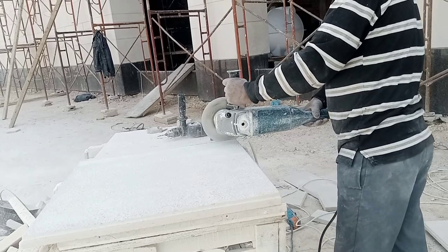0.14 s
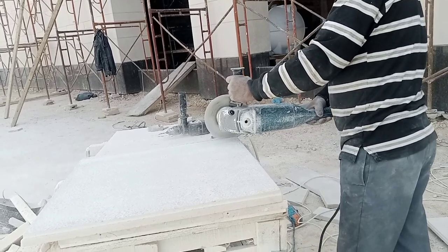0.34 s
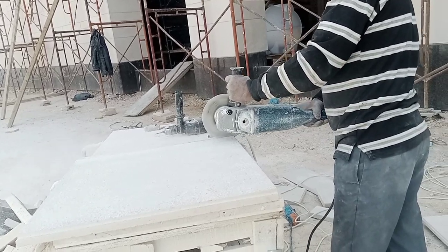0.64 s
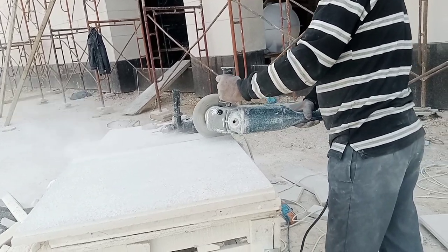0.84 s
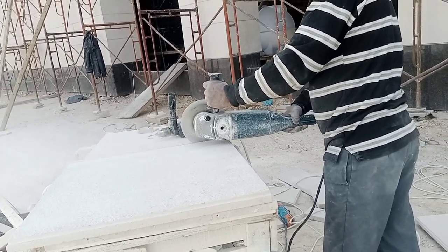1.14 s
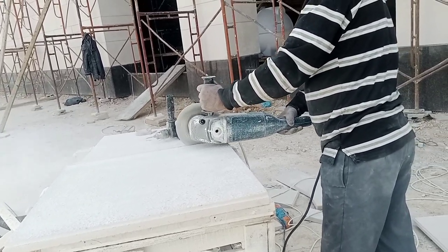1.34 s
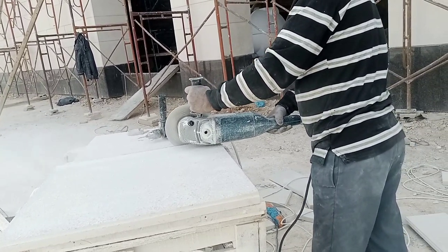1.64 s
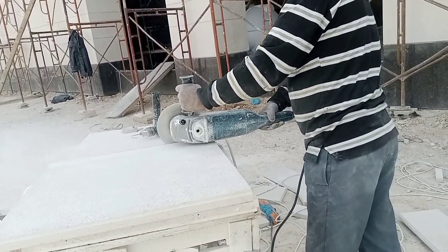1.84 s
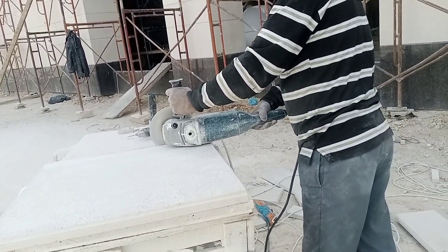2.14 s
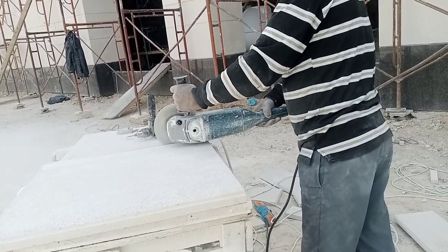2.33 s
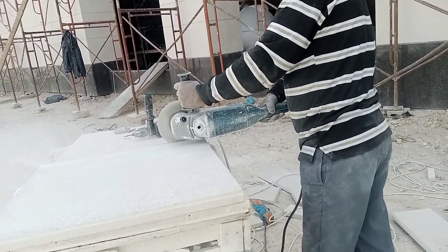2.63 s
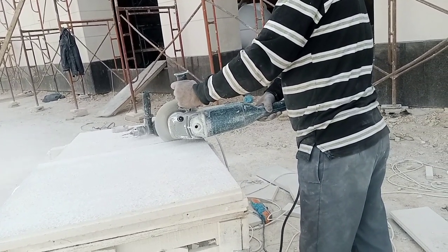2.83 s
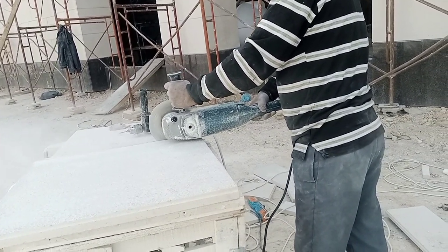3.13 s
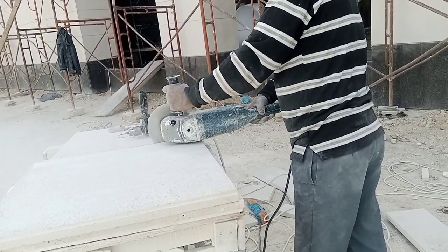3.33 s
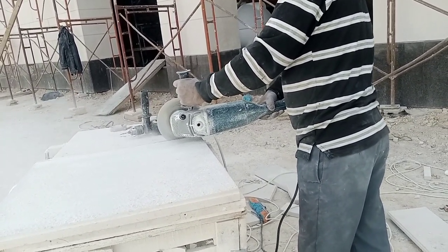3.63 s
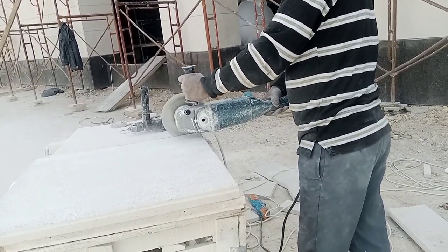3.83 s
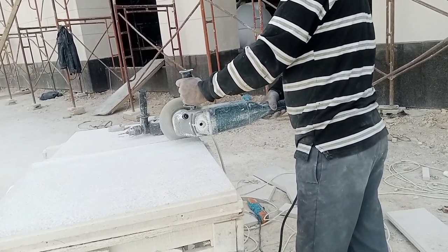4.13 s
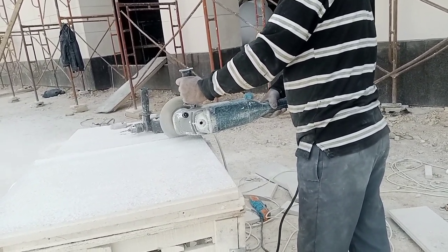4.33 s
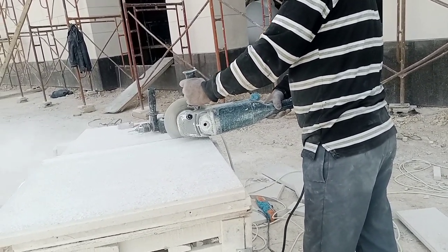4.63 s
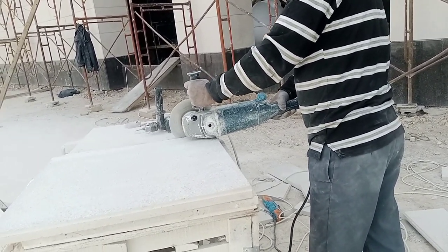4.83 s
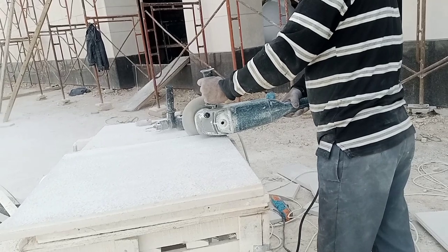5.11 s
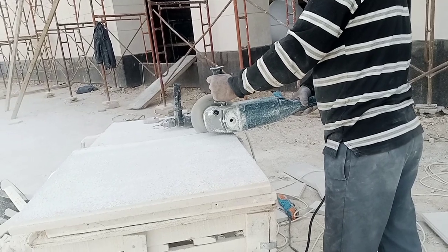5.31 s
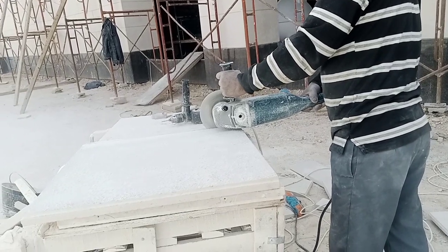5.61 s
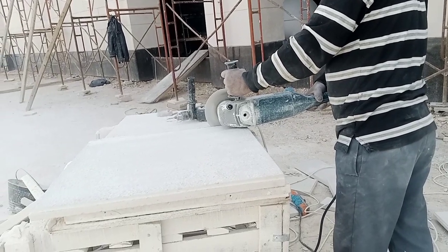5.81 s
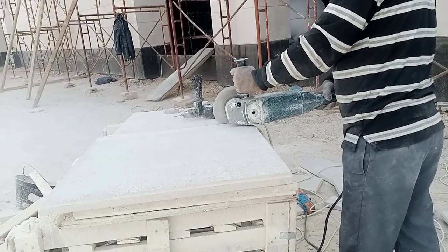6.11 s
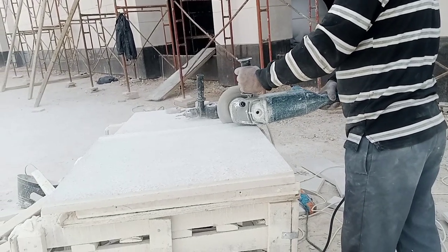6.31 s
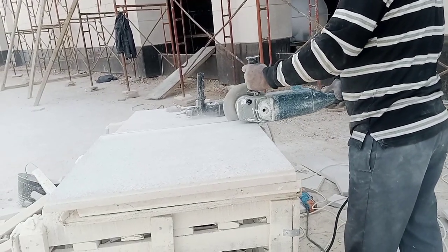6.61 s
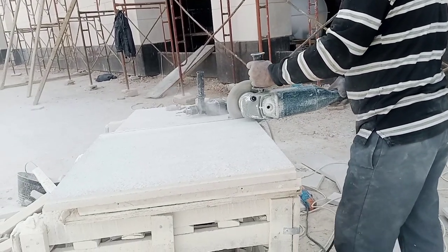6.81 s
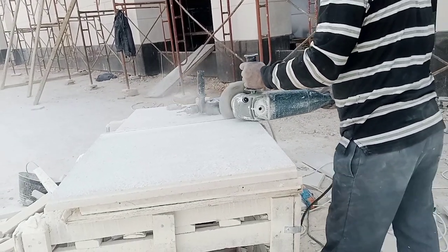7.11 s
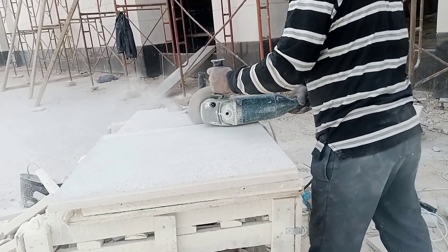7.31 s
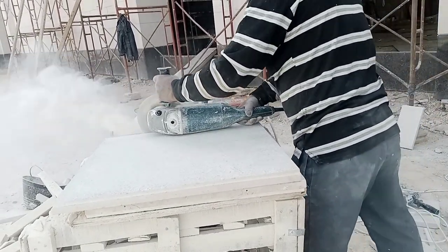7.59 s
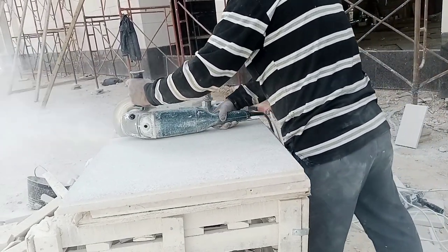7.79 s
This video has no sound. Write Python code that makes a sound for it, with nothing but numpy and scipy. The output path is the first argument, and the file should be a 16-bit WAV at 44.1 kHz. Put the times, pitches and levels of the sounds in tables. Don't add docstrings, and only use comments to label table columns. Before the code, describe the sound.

Outdoors and a few steps from the phone, a large angle grinder is already cutting a stone slab at full loudness. From 0 s there is dense gritty hiss, metallic disc ringing and gear and fan whine, over a rough midrange slab hum. Pitch rises briefly to about 0.6 s, sags under load to its lowest around 2 s, then climbs unevenly. Short rough tones sing out early and near 3.7 s. Thin, very high squeal rubs along the cut, clearest around 3.6-4.5 s, then fades after 4.9 s. The ring brightens from about 5.3 s. Near 6.4 s the disc bites, clears the cut and revs up; hum and clean tones thin, but harsh hiss remains. Faint dull pallet knocks come at 7.1 and 7.4 s amid small wind thumps. Pressure stutters near 7.7 s, and the grinder is still running high at 8 s.

```python
import sys
import numpy as np
from scipy import signal
from scipy.fft import rfft, irfft, next_fast_len
from scipy.io import wavfile
from scipy.ndimage import uniform_filter1d, minimum_filter1d, map_coordinates

SR = 44100
rng = np.random.default_rng(int(sys.argv[2]) if len(sys.argv) > 2 else 0)


def unload_wav(signal):
    wavfile.write(
        sys.argv[1],
        SR,
        np.round(np.clip(np.atleast_2d(signal).T, -1, 1) * 32767).astype(np.int16),
    )


def field_ratio(decibels):
    return 10 ** (np.asarray(decibels, dtype=float) / 20)


N = 350595
STEP = 64
SIZE = next_fast_len(N + 8192)
TEETH, BLADES = 47, 14
GEAR = 47 / 10
HUMMED = 8, 9, 10, 18, 24


def unit(x):
    return x / np.sqrt(np.mean(x ** 2) + 1e-20)


def along(points, hz):
    f, v = np.transpose(points)
    return np.interp(np.log(hz + 1), np.log(f + 1), v)


def slow_times():
    return np.arange(0, N + STEP, STEP) / SR


def full(slow):
    return np.interp(np.arange(N), np.arange(0, N + STEP, STEP), slow)


def curves(rows):
    s, *cols = np.transpose(rows)
    return [np.interp(slow_times(), s, c) for c in cols]


def bumps(rows):
    t = slow_times()
    return sum((db * np.exp(-((t - s) / half) ** 2) for s, db, half in rows), 0 * t)


def wobble(rate):
    knots = rng.standard_normal(int(N * rate / SR) + 4)
    return map_coordinates(knots, [slow_times() * rate])


def sine(cycles):
    return np.sin(np.float32(2 * np.pi * (cycles - np.floor(cycles))))


def resonance(f, modes):
    return sum(field_ratio(db) * f * w / np.hypot(c * c - f * f, f * w) for c, w, db in modes)


def coloured(bins, spectrum, modes=()):
    f = np.fft.rfftfreq(SIZE, 1 / SR)
    ring = resonance(f, modes) if modes else 1
    gain = np.float32(field_ratio(along(spectrum, f)) * ring)
    return unit(irfft(bins * gain, SIZE)[:N])


def patchy(x, depth_db, wide_hz, long_s, size=1024):
    z = signal.stft(np.float32(x), nperseg=size)[2]
    field = rng.standard_normal(z.shape, np.float32)
    for cells, axis in ((wide_hz * size / SR, 0), (long_s * SR * 2 / size, 1)):
        cells = max(round(cells), 1)
        field = uniform_filter1d(uniform_filter1d(field, cells, axis), cells, axis)
    return signal.istft(z * np.float32(field_ratio(depth_db * unit(field))), nperseg=size)[1][:N]


def repeating(turns, orders, drift_db, wear, without, size=2048, count=16):
    sizes = np.zeros((N // STEP + 2, size // 2 + 1), np.complex64)[::count]
    lowest, highest = int(orders[0][0]), int(orders[-1][0])
    for k in sorted(set(range(lowest, highest + 1)) - set(without)):
        height = field_ratio(along(orders, k) + drift_db * wobble(wear))[::count]
        sizes[:, k] = height * np.exp(2j * np.pi * rng.random())
    profile = np.pad(irfft(sizes, size) * size / 2, ((0, 1), (0, 1)), "wrap")
    place = [np.arange(N) / (STEP * count), turns % 1 * size]
    return map_coordinates(profile, place, order=1) * 2 / np.sqrt(SR)


def stance_db(dbs, shares):
    return np.dot(dbs, shares) / sum(shares)


def posed(drive, shares, colours):
    return sum(full(share) * coloured(drive, colour) for share, colour in zip(shares, colours))


# (time [s], level [dB])
WIND = [(0, -61), (4.4, -60.5), (5.2, -65.5), (6.7, -73), (7.95, -69)]
# (time [s], change [dB], half length [s])
GUSTS = [(.25, 5, 0.11), (1.37, 7, 0.17), (1.75, 3.5, .2), (2.97, 0, 0.072), (4.74, -10, .04),
         (5.02, 5, .05), (5.38, 8, 0.034), (6.86, 10, .08), (7.24, -12, .05), (7.37, 10, .05),
         (7.62, 11, 0.047), (7.78, -18, .05)]
# (frequency [Hz], level [dB per Hz])
BUFFET = [(15, -30), (40, -16), (70, -2.5), (120, 1.5), (170, -4.5), (400, -60)]


def wind():
    lumps = patchy(rng.standard_normal(N), depth_db=2, wide_hz=45, long_s=.07, size=2048)
    level_db = curves(WIND)[0] + bumps(GUSTS) + 2.0 * wobble(5.9)
    return full(field_ratio(level_db)) * coloured(rfft(lumps, SIZE), BUFFET)


# (time [s], peak [dB], frequency [Hz])
STEPS = [
    (7.12, -43, 215),
    (7.13, -45, 320),
    (7.42, -43, 220),
]


def steps():
    out = np.zeros(N + SR)
    t = np.arange(SR // 4) / SR
    for s, db, hz in STEPS:
        envelope = field_ratio(db - 60 * t / 0.21) * (1 - np.exp(-t / 0.013))
        out[round(s * SR):][:len(t)] += envelope * np.sin(2 * np.pi * hz * t)
    return out[:N]


# (time [s], frequency [Hz], level
# [dB], half length [s])
SINGS = [(.2, 1700, -33, .1), (.5, 1100, -37, .06), (.63, 1700, -31, .06), (1.33, 1075, -37, .12),
         (2.44, 1075, -38, .07), (3.75, 1720, -35, .15), (5.9, 182, -49, .4), (2.07, 990, -36, .04)]


def singing():
    t, slow = np.arange(N) / SR, slow_times()
    out = np.zeros(N)
    for s, hz, db, half in SINGS:
        envelope = field_ratio(db + 2 * wobble(40)) * np.exp(-((slow - s) / half) ** 2)
        out += full(envelope) * sine(hz * t + full(0.073 * wobble(40)))
    return out


# (frequency [Hz], width [Hz], level [dB])
SLAB = [(231, 55, -5), (397, 60, -6.5), (503.2, 34, -4), (690, 51, -6.5), (987, 12.5, 0.5),
        (1101, 45, -3.5), (1426, 32, -3), (1900, 82, -13.5)]
# (frequency [Hz], level [dB per Hz])
SLAB_CUT = [(100, -50), (160, -4.5), (200, -1.5), (1750, 2.5), (2200, -26), (3700, -120)]
SLAB_FREE = [(120, -68), (200, -31), (333, -5), (503, -8.5), (892, -9), (967, -19), (1030, -4.5),
             (1700, -9.5), (2210, -17), (3740, -120)]
SLAB_OVER = [(120, -74), (200, -23), (361, -22), (395, -12.5), (526, -4.5), (664, -22), (993, -0.5),
             (1160, -11), (1700, -5.5), (2210, -22), (3740, -120)]


def slab_hum(force, shares, touch, push_db, weight_db):
    contact, lean = full(touch), full(shares[3])
    shaken = rfft(patchy(force, depth_db=1.8, wide_hz=60, long_s=.3), SIZE)
    free = (1 - lean) * coloured(shaken, SLAB_FREE) + lean * coloured(shaken, SLAB_OVER)
    slab = contact ** 2 * coloured(shaken, SLAB_CUT, SLAB) + (1 - contact) * free
    rock_db = 2 * wobble(7)
    level_db = stance_db((-36, -33.5, -40, -37.5), shares) + 1.15 * push_db + weight_db + rock_db
    return full(field_ratio(level_db)) * slab


# (frequency [Hz], level [dB])
FOURTH = [(165, -77), (190, -66), (200, -52), (220, -44.5), (235, -41.5), (250, -49), (320, -50)]
ARMATURE = [(190, -54), (214, -45.5), (226, -47.5), (238, -46.5), (252, -48.5), (270, -77), (325, -56),
            (370, -47)]
MESH = [(1915, -31), (2050, -39), (2150, -33), (2330, -30), (2445, -29.5), (2570, -26.5), (2750, -29),
        (2900, -24)]
FAN = [(2690, -38), (2790, -51), (3130, -31), (3300, -39), (3450, -31.5), (3650, -33), (3870, -28),
       (4100, -46)]
# (time [s], disc order [turns], change [dB], half length [s])
SWELLS = [(.2, 47, -10, .2), (.6, 48, 7, .2), (1.05, 47, -9, .15), (1.65, 47, 4, .3), (1.6, 48, -12, .6),
          (2.8, 47, -9, .55), (3.0, 48, -12, .7), (4.3, 48, 3, .3), (3.65, 4.7, 4, .3), (4.75, 4, -10, .12),
          (3.65, 47, 5, .15), (4.4, 65.8, -12, .5), (5.9, 65.8, 3, .15), (5.2, 65.8, -12, .17),
          (5.8, 48, -9, .6), (4.4, 9, 5, .45), (7.5, 47, 14, .2), (.1, 8, 2, .3), (1.0, 8, 6, .2),
          (5.9, 8, -5, .5), (.5, 4.7, -10, .3), (2.6, 9, -5, .2), (5.8, 10, -10, .7), (3.5, 18, -14, .3),
          (4.35, 18, 8, .3), (5.25, 18, -10, .3), (.9, 24, -18, .5), (1.75, 24, -5, .2), (2.45, 24, 5, .1),
          (3.1, 24, -16, .4)]


def machine_tones(turns, speed, touch):
    orders = 4, GEAR, TEETH, TEETH + 1, BLADES * GEAR, *HUMMED
    unloaded = 1 - np.clip(touch / .85, 0, 1)
    fourth_db = along(FOURTH, 4 * speed) - 16 * unloaded
    mesh_db = along(MESH, TEETH * speed) - 27 * unloaded + 1.8 * wobble(9)
    sideband_db = mesh_db - 1.5
    fan_db = along(FAN, BLADES * GEAR * speed)
    levels = [fourth_db, along(ARMATURE, GEAR * speed), mesh_db, sideband_db, fan_db]
    for k, db in zip(HUMMED, (-41.5, -43.5, -39, -42, -41)):
        ring_db = 20 * np.log10(resonance(k * speed, SLAB))
        levels.append(db + 1.2 * ring_db + 1.5 * wobble(3.056) - 44 * unloaded)
    out = np.zeros(N)
    for k, db in zip(orders, levels):
        swell_db = bumps([(s, change, half) for s, order, change, half in SWELLS if abs(order - k) < .35])
        level = full(field_ratio(db + swell_db + 3 + .8 * wobble(12)))
        out += level * sine(k * turns + full(.04 * wobble(20)))
    return out


# (order [per turn], level [dB over 1 Hz of grit])
RIM = [(2, 6), (3, 16), (5, 19), (7, 17), (8, 21), (10, 22), (13, 19), (14, 13), (17, 18), (18, 22),
       (19, 16), (23, 14), (24, 17), (33, 16), (37, 12), (60, 8)]
ROTOR = [(2, 17), (12, 5.4), (13, 6.4), (16, 13.6), (25, 6.9)]


def grit(turns, contact):
    sung = 4, TEETH, TEETH + 1, *HUMMED
    rim = field_ratio(1.5) * contact ** 2 * repeating(turns, RIM, drift_db=2.6, wear=2.5, without=sung)
    rotor = repeating(GEAR * turns, ROTOR, drift_db=1.5, wear=3.2, without=(BLADES,))
    runout_db = .7 * contact * np.sin(2 * np.pi * turns)
    chatter = field_ratio(full(0.21 * wobble(40) + 0.39 * wobble(110)) + runout_db)
    return chatter * rng.standard_normal(N) + rim + rotor


# (frequency [Hz], level [dB per Hz])
WHISTLE = [(12500, -70), (13800, -32), (14150, -13), (14500, -4), (15000, 0), (15500, -2)]


def rim_whistle(drive, rub_db, jolt_db):
    level_db = rub_db + 1.2 * jolt_db + 3.0 + .9 * wobble(60)
    return full(field_ratio(level_db)) * coloured(drive, WHISTLE)


# (time [s], change [dB], half length [s])
SHADED = [
    (.1, -0.5, .2),
    (2.2, -7.5, .13),
    (3.37, -7, .09),
    (7.8, -2, 0.18),
]


def shaded(x):
    high = signal.butter(3, 8200, "high", fs=SR, output="sos")
    return x + (full(field_ratio(bumps(SHADED))) - 1) * signal.sosfiltfilt(high, x)


# (frequency [Hz], level [dB per Hz])
RING_SIDE = [(2940, -42), (5000, -12), (5300, -5.5), (5570, -5.5), (6450, 2.5), (6680, 2.5), (7770, -8.5),
             (8830, -11.5), (9990, -27.5), (12600, -30), (16400, -61), (22000, -120)]
RING_NEAR = [(2940, -56), (5000, -8), (5320, -6.5), (5900, 2), (6890, 2), (8050, -8.5), (8860, -8.5),
             (10700, -25), (12600, -29.5), (16400, -51), (22000, -120)]
RING_FACE = [(2940, -67), (5000, -17), (5200, -32), (5540, -8.5), (5960, -14), (6440, 2.5), (6690, 8.5),
             (7190, -18), (7440, 2), (7840, -10), (8140, -13.5), (9140, -39), (9910, -37.5), (11100, -62),
             (13900, -55)]
RING_OVER = [(2940, -46), (5000, -2), (6250, 2.5), (6600, 0.5), (7100, -5), (7740, -3), (8350, -12.5),
             (10600, -20), (12500, -38), (13900, -29)]


def disc_ring(drive, shares, push_db):
    ring = shaded(posed(drive, shares, (RING_SIDE, RING_NEAR, RING_FACE, RING_OVER)))
    return full(field_ratio(stance_db((-23.5, -27, -21, -30), shares) + 1.65 * push_db)) * ring


# (frequency [Hz], level [dB per Hz])
GRIND_SIDE = [(880, -88), (1500, -36), (1600, -26), (1670, -11.5), (1820, -11), (1880, -8.5), (2240, 7),
              (2430, -2.5), (2620, 4.5), (2930, -6), (3150, 0.5), (3670, -12), (3990, -2), (4700, -22.5),
              (5100, -36), (6630, -52), (11200, -120)]
GRIND_NEAR = [(880, -54), (1500, -29), (1600, -41), (1740, -11.5), (2030, -10), (2200, 0), (2330, 0.5),
              (2630, -0.5), (2870, -5.5), (3390, -2), (3660, -14.5), (3950, -5), (4400, -22), (4850, -15.5),
              (5100, -39), (6630, -66), (11200, -120)]
GRIND_FACE = [(880, -39.5), (1500, -27), (1820, -15), (2010, -22), (2210, -10), (2860, 2), (3170, -5),
              (3460, 0.5), (3640, -15), (3970, -0.5), (4290, -33), (4630, -14), (5100, -44), (6630, -66),
              (11200, -120)]
GRIND_OVER = [(880, -57), (1500, -29), (1720, -26), (1910, -15.5), (2170, -1), (2860, 3.5), (3390, -6.5),
              (3850, 5.5), (4070, -2.5), (4770, -7), (5100, -41), (6630, -52), (11200, -120)]


def grind(drive, shares, push_db):
    hiss = posed(drive, shares, (GRIND_SIDE, GRIND_NEAR, GRIND_FACE, GRIND_OVER))
    return full(field_ratio(stance_db((-18, -19.5, -19.5, -17.5), shares) + push_db)) * hiss


# (time [s], speed [turns per s])
SPIN = [(0, 49.7), (.54, 55.8), (.73, 55.5), (1.15, 45.4), (1.47, 41.6), (2.08, 40.4), (2.5, 45.7),
        (2.93, 48.6), (3.36, 47.3), (3.7, 51.1), (4.16, 54.9), (4.86, 51.3), (5.25, 56.1), (5.62, 59.6),
        (6.42, 63.1), (7.0, 73.8), (7.25, 75.7), (7.95, 78.7)]
# (time [s], drawn nearer [0-1], disc face on [0-1], leaning over slab [0-1], rim in the cut [0-1])
POSE = [(0, 0, 0.07, 0.16, 1), (2, 0.25, 0.2, 0.15, 0.76), (2.4, 1, 0.02, 0.11, 0.9),
        (3.5, 0.73, 0, 0.13, 0.84), (4.5, 0.89, 0, 0.18, 0.82), (5.3, 0.59, 0.5, 0.03, 0.84),
        (5.9, 0.25, 0.79, 0, 0.83), (6.33, 0.28, 0.84, 0, 0.87), (6.42, 0, 0.74, 0.17, 0.2),
        (7.33, 0, 0.54, 0.08, 0.36), (7.4, 0.51, 0.15, 0.44, 0.14), (7.75, 0.05, 0.15, 0.85, 0.16),
        (7.95, 0.5, 0.05, 0.5, 0.43)]
# (time [s], pressure [dB], rim rubbing cut wall [dB], weight shaking slab [dB])
HANDS = [(0, -0.5, -36, 2.5), (.26, -1.5, -40, 1), (.5, -1, -39, 1), (1.15, 0, -39, 1), (1.93, 0, -35, 2.5),
         (2.28, 1, -43, -2), (2.45, -0.5, -39, 0), (2.7, 0, -37.5, -3), (3.0, 1, -37, -3.5),
         (3.21, 1, -35, -2), (3.38, 1, -39, -1), (3.64, 0, -31, 2), (3.95, 0.5, -34, 3),
         (4.13, -0.5, -32, 0), (4.4, 0, -29.5, 1.5), (4.69, 0, -37, -3), (4.9, 0, -49, 0.5),
         (7.95, .5, -55, 1)]
# (time [s], change [dB], half length [s])
JOLTS = [(.41, -0.5, 0.037), (2.35, 1, 0.017), (3.67, 0, .02), (4.02, -1, 0.037), (5.58, -1, 0.046),
         (6.29, -1.5, 0.051), (6.39, 2, 0.05), (7.02, -1, 0.05), (7.31, 1.5, .04), (7.66, -2.5, .018),
         (7.7, 1.5, .02)]


def scene():
    inertia_s = .12
    speed = uniform_filter1d(curves(SPIN)[0], round(inertia_s * SR / STEP), mode="nearest")
    turns = np.cumsum(full(speed)) / SR
    press_db, rub_db, weight_db = curves(HANDS)
    jolt_db = bumps(JOLTS)
    push_db = press_db + jolt_db
    near, face, over, touch = np.clip(curves(POSE), 0, 1)
    side = np.clip(1 - near - face - over, 0, 1)
    shares = side, near, face, over
    force = grit(turns, full(touch))
    drive = patchy(force, depth_db=1.7, wide_hz=70, long_s=.25)
    drive = rfft(patchy(drive, depth_db=1.2, wide_hz=400, long_s=.015), SIZE)
    mix = wind() + steps() + singing()
    mix += slab_hum(force, shares, touch, push_db, weight_db)
    mix += machine_tones(turns, speed, touch)
    mix += rim_whistle(drive, rub_db, jolt_db)
    mix += disc_ring(drive, shares, push_db)
    mix += grind(drive, shares, push_db)
    return mix[None]


def limited(x, top, size=131):
    gain = minimum_filter1d(np.minimum(1, top / (np.abs(x) + 1e-9)), 2 * size)
    return x * uniform_filter1d(uniform_filter1d(gain, size), size)


def thinned(x, below_db, faint_db, size=2048, count=8):
    top_hz = 15485
    hz, _, z = signal.stft(np.float32(x), SR, nperseg=size)
    strips = np.arange(len(hz)) // count
    power = np.add.reduceat(np.abs(z) ** 2, np.arange(0, len(hz), count))[strips] / count
    whistle = power[(hz > 14300) & (hz < top_hz)].mean(0)
    reach = field_ratio(-below_db - np.clip(13000 - hz, 0, SR) / 60)[:, None] ** 2
    heard = power > whistle * reach + field_ratio(faint_db) ** 2
    heard = heard | (hz < 11000)[:, None]
    return signal.istft(z * heard * (hz < top_hz)[:, None], SR, nperseg=size)[1][:N]


def band_limit(x):
    return signal.sosfilt(signal.butter(12, 16840, fs=SR, output="sos"), x)


def record(dry):
    held = limited(dry[0], top=.53)
    kept = thinned(held, below_db=20.5, faint_db=-92)[None]
    return band_limit(kept)


dry = scene()
out = record(dry)
unload_wav(out)
```